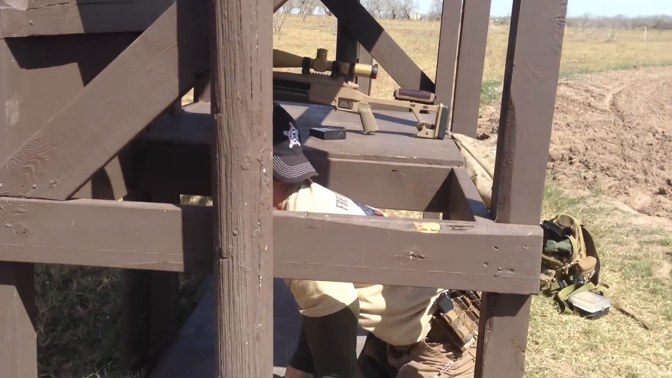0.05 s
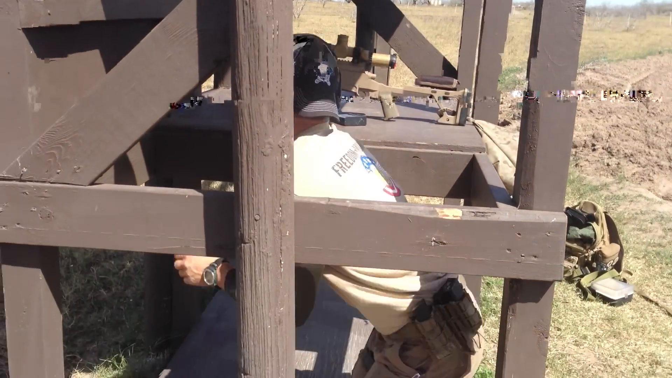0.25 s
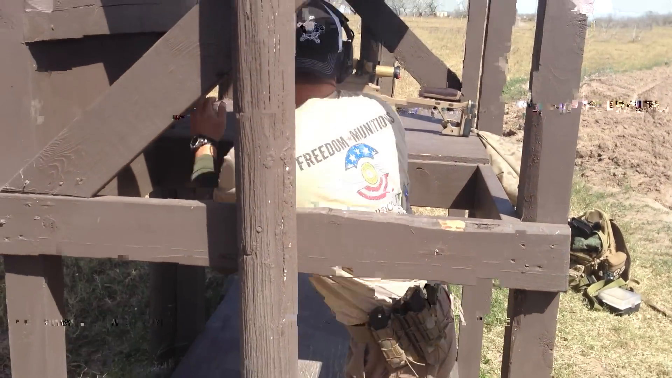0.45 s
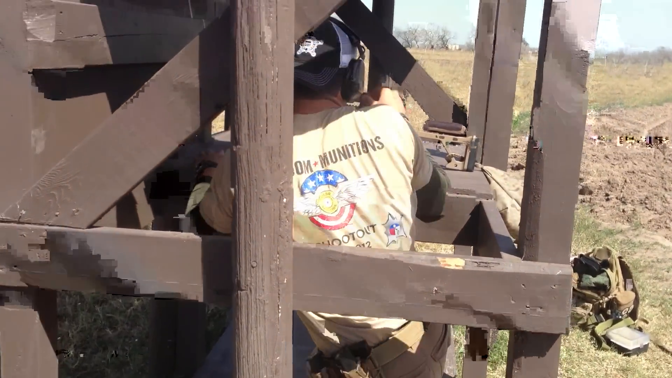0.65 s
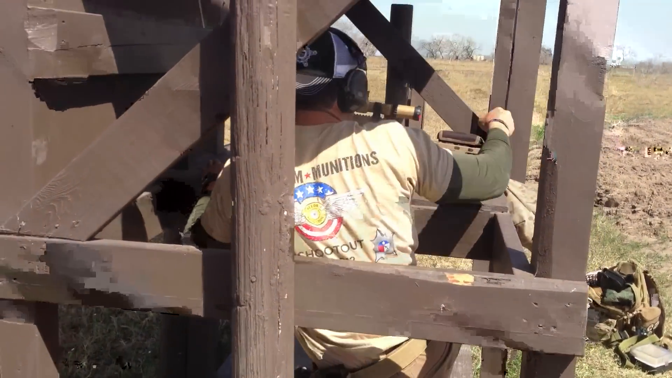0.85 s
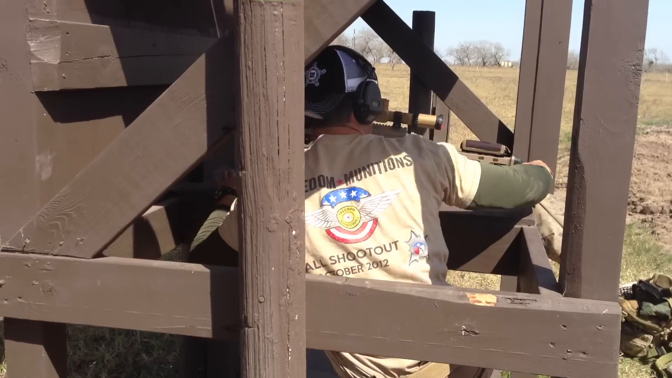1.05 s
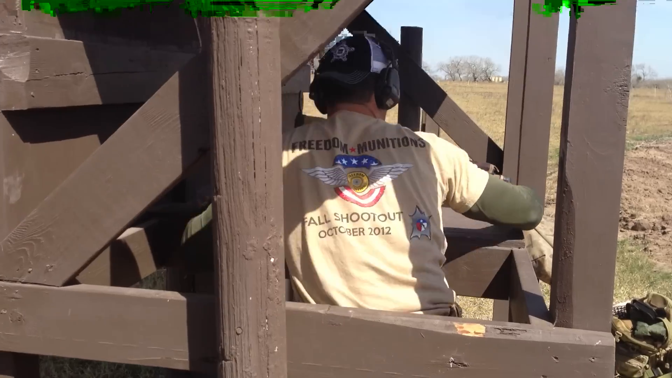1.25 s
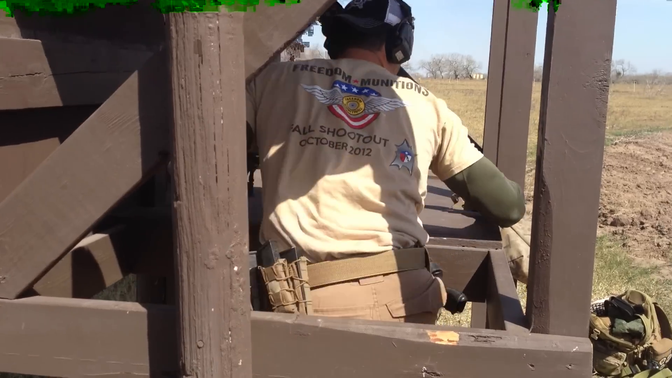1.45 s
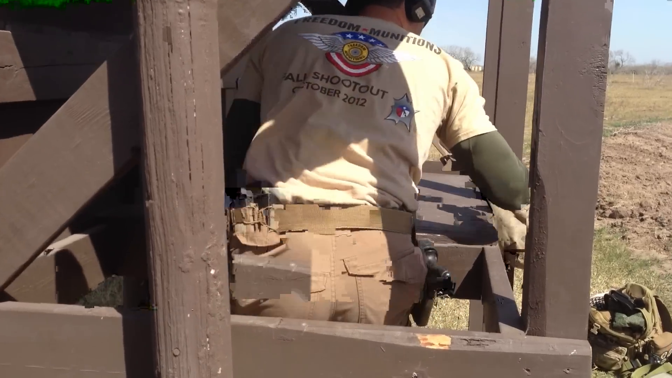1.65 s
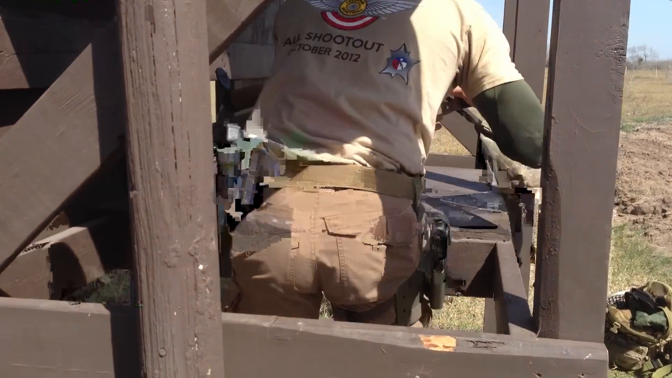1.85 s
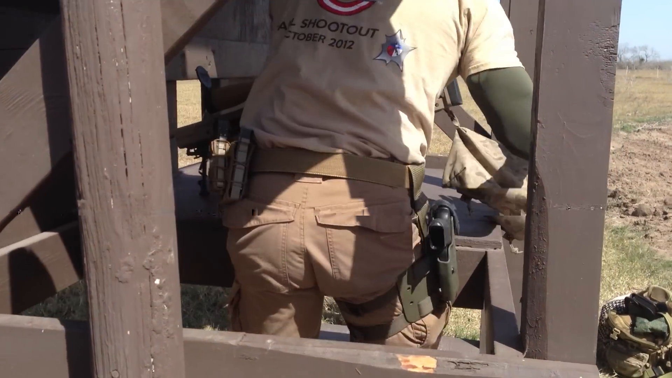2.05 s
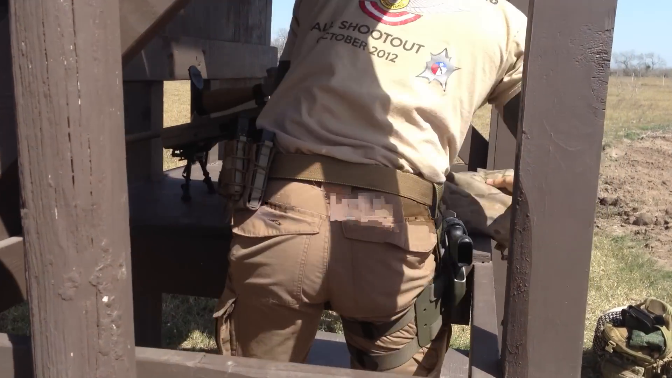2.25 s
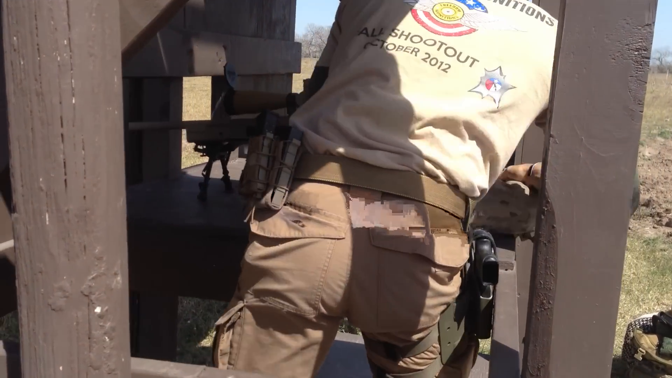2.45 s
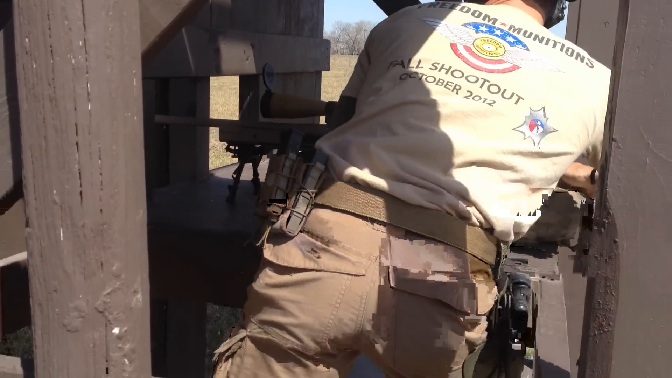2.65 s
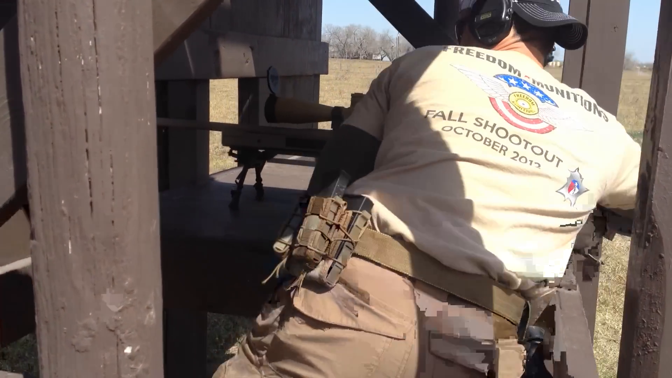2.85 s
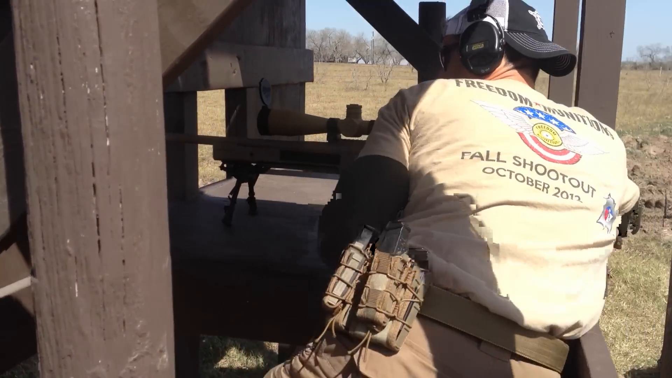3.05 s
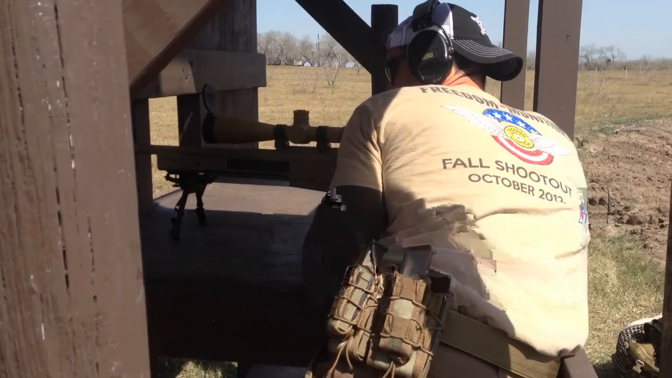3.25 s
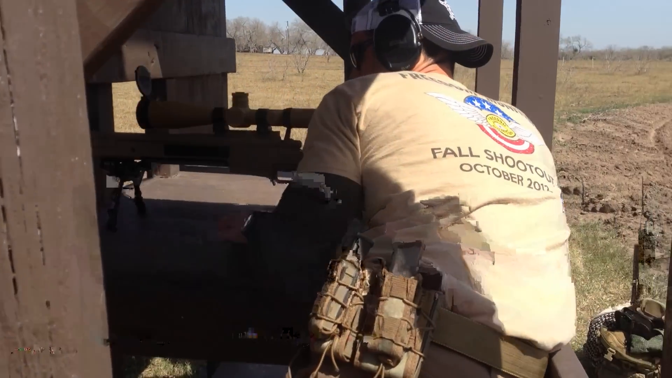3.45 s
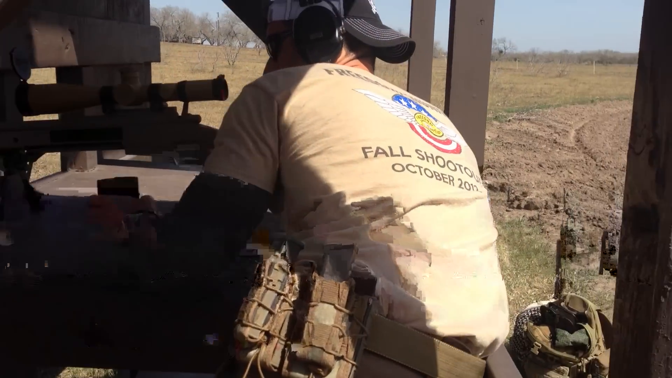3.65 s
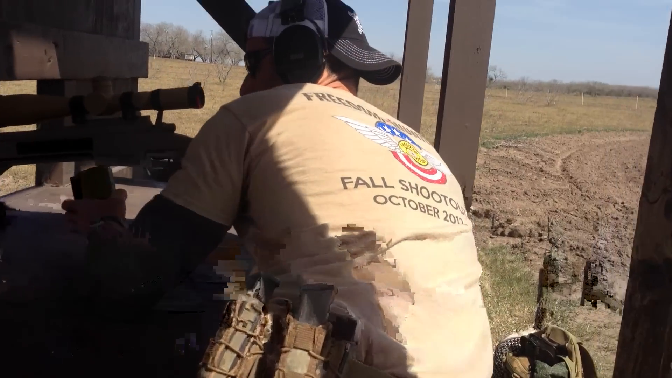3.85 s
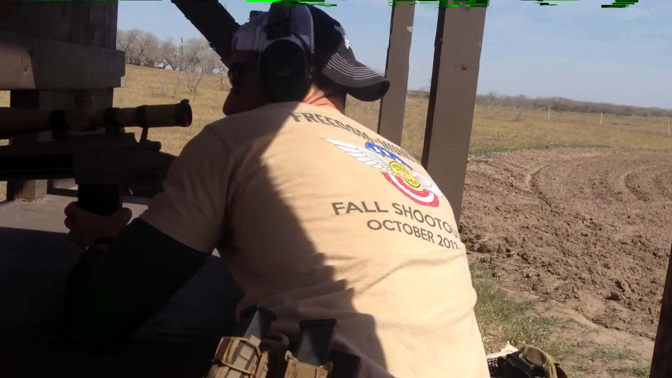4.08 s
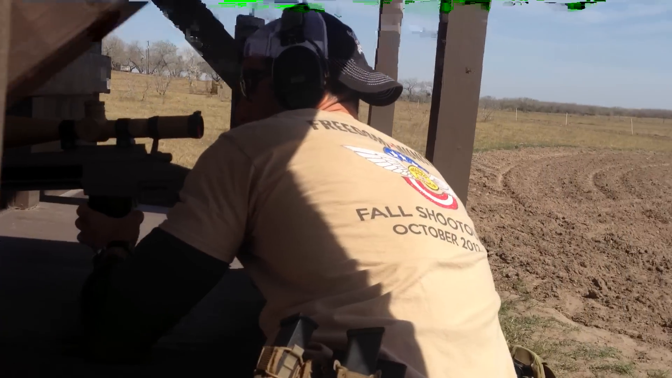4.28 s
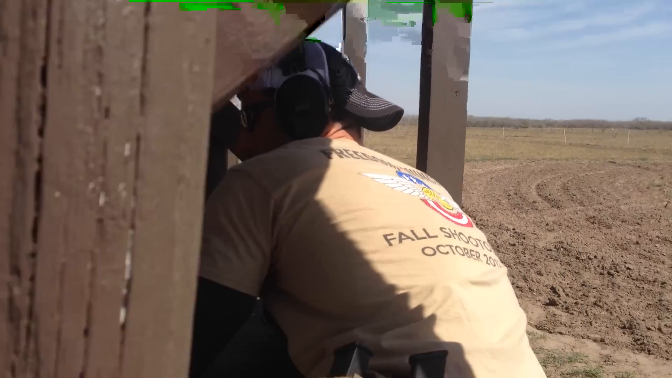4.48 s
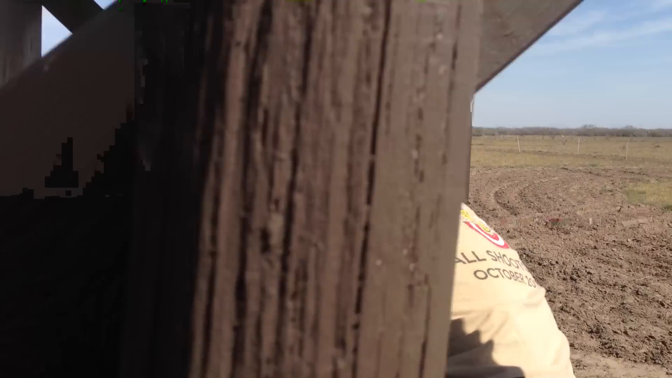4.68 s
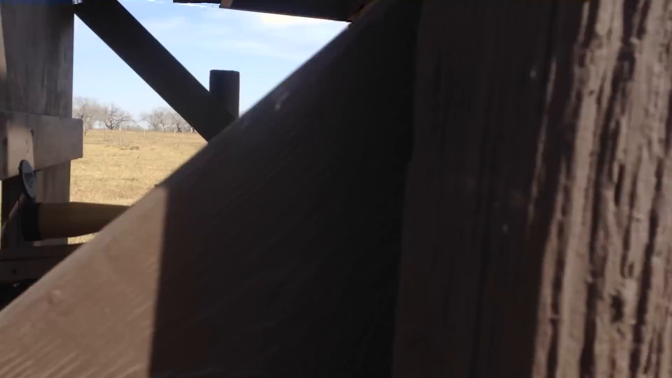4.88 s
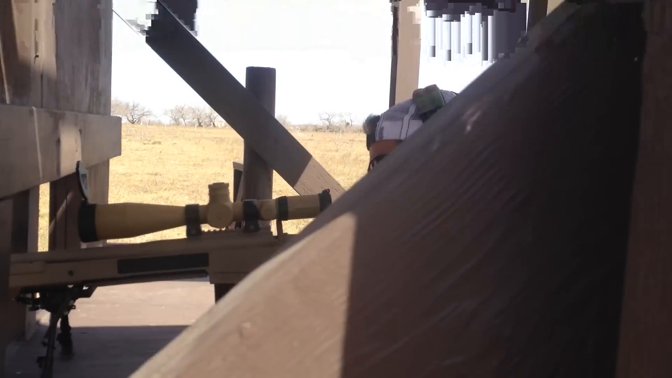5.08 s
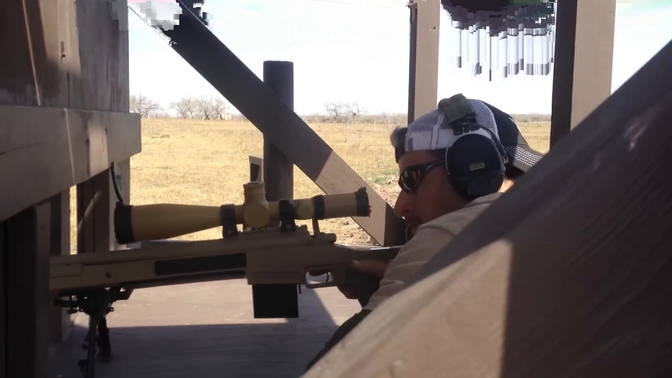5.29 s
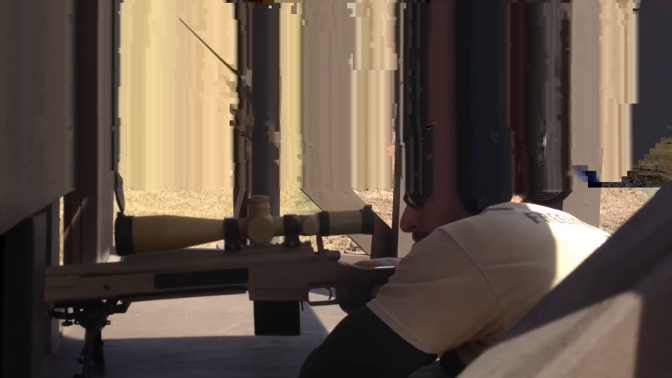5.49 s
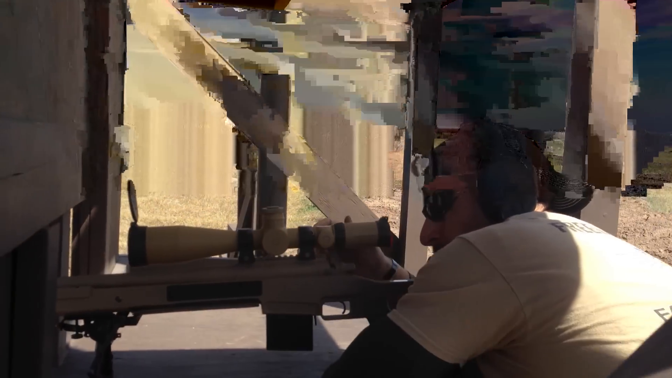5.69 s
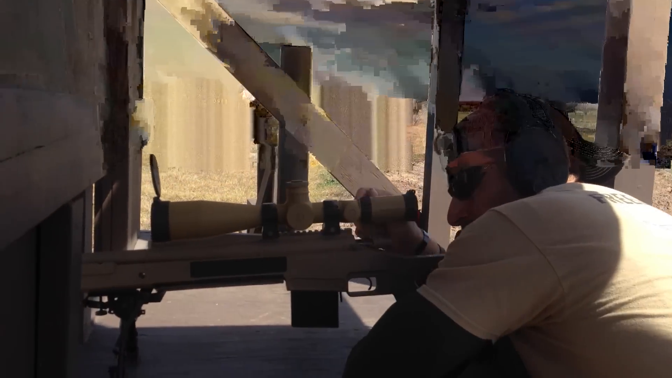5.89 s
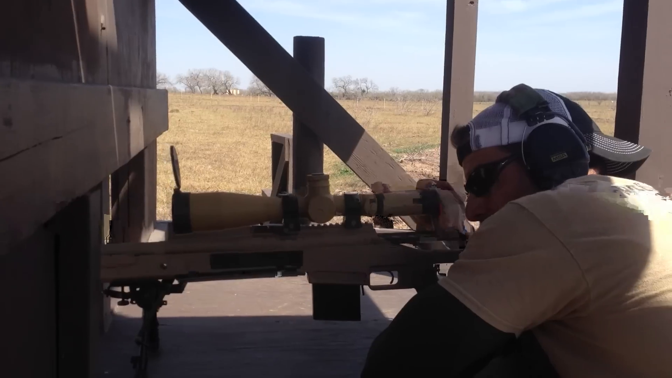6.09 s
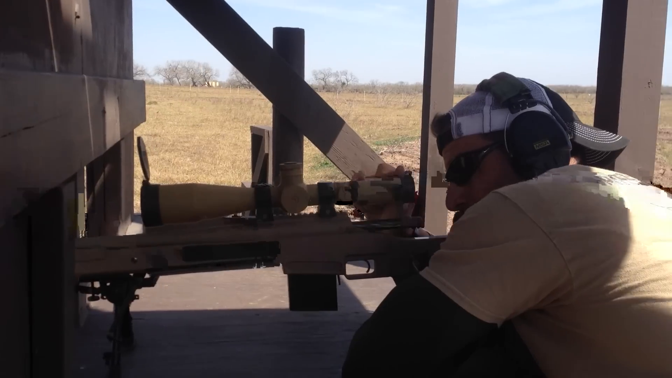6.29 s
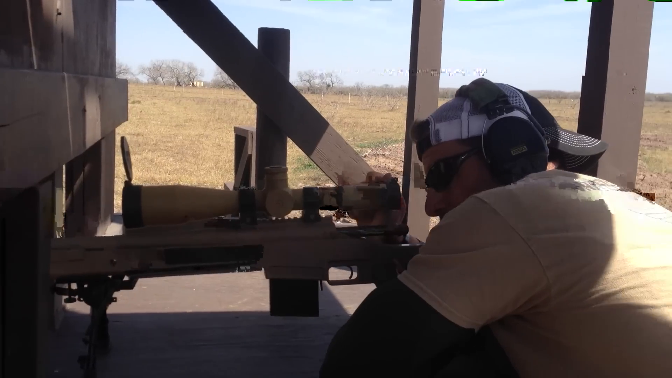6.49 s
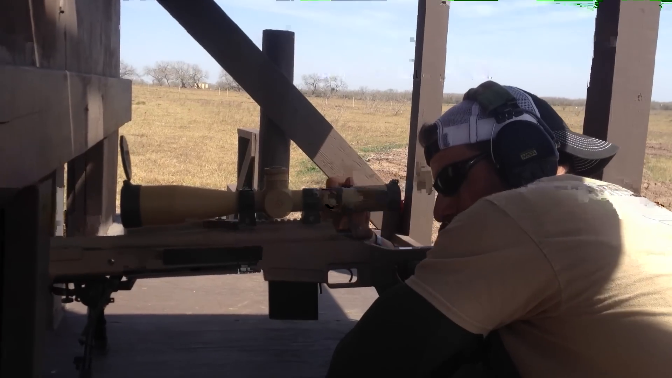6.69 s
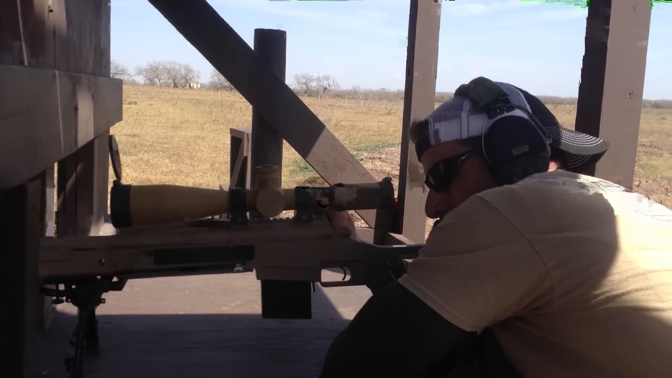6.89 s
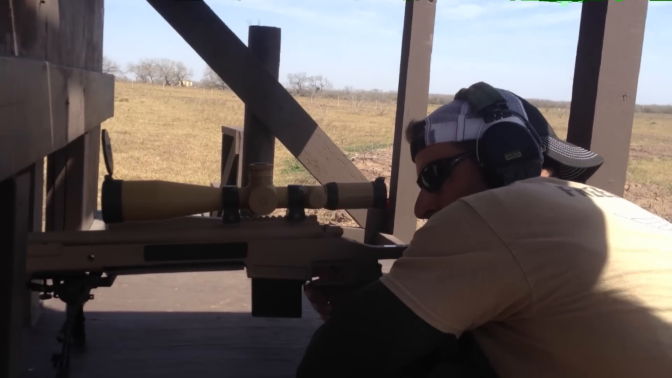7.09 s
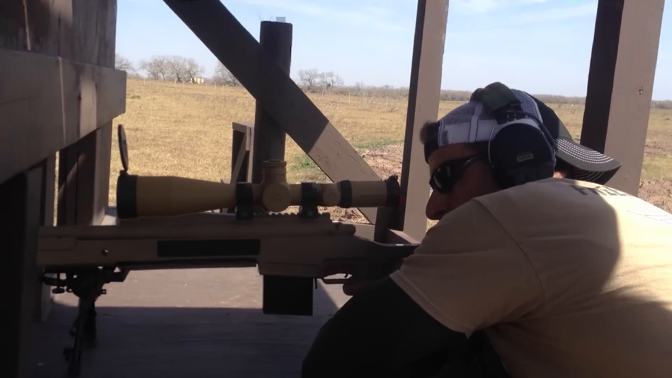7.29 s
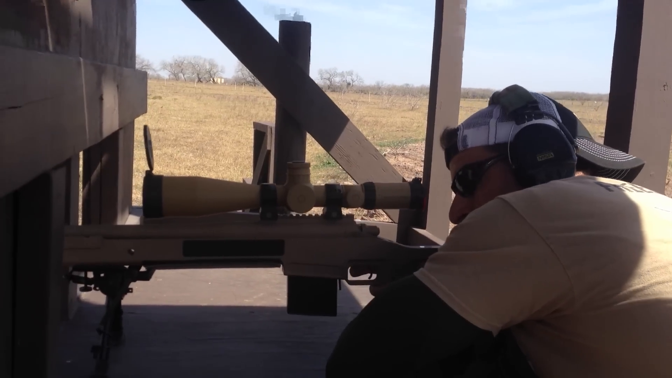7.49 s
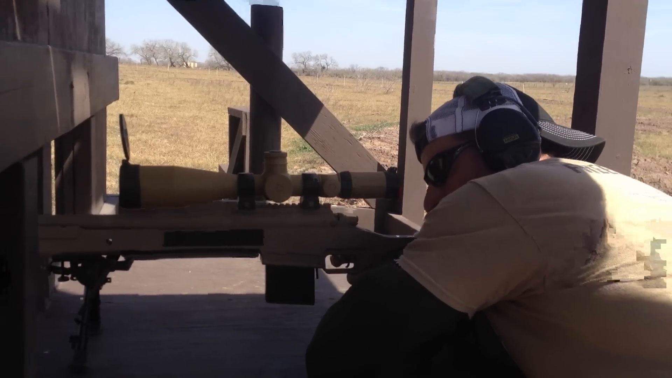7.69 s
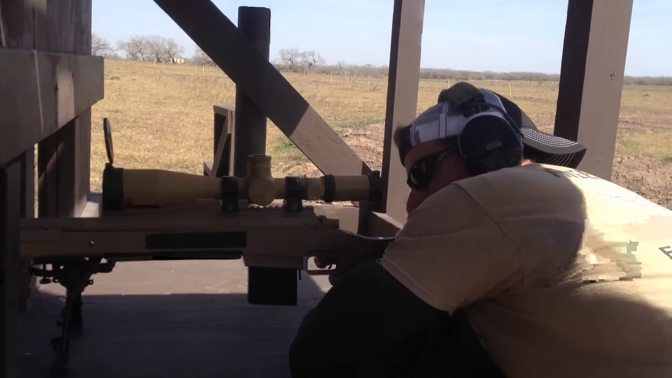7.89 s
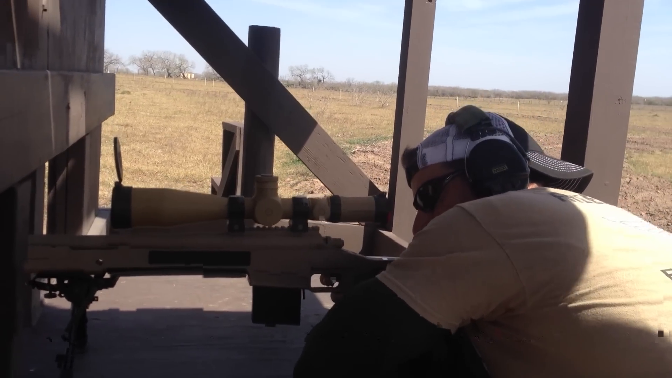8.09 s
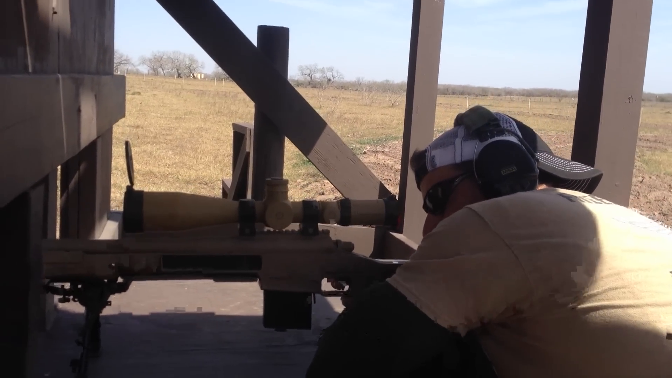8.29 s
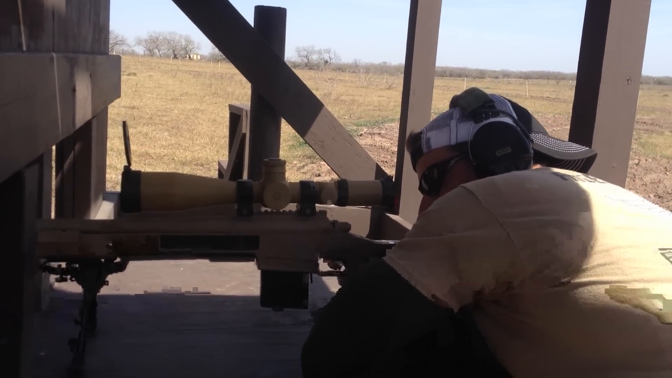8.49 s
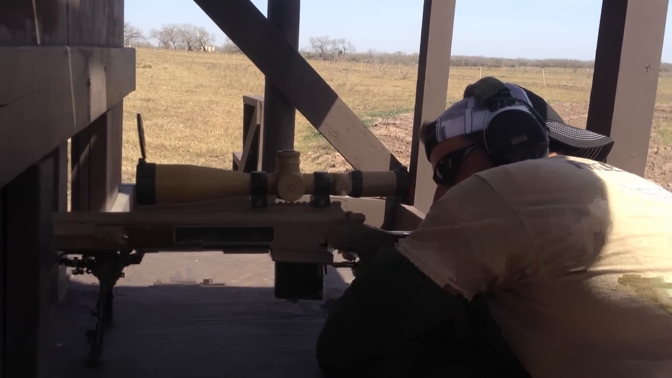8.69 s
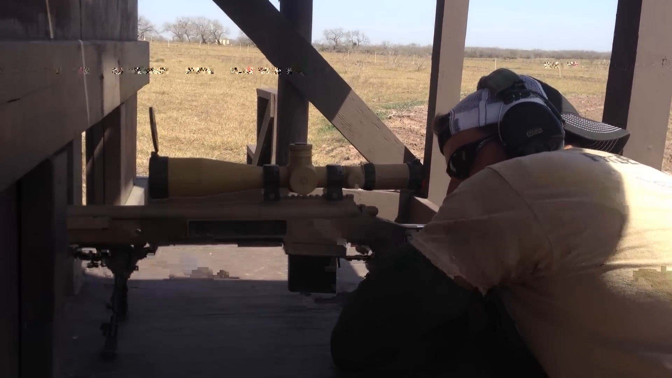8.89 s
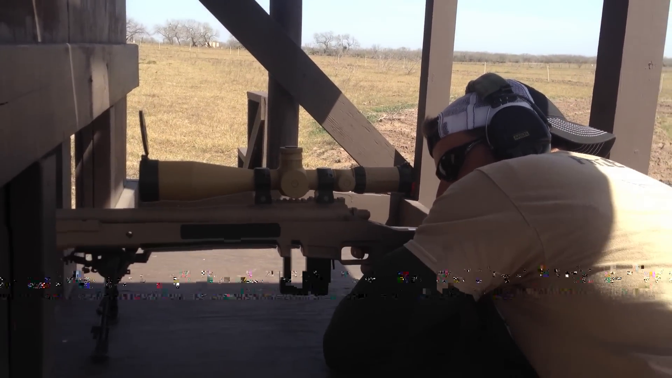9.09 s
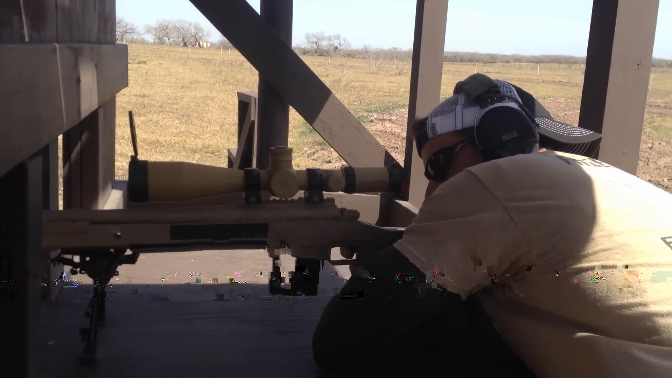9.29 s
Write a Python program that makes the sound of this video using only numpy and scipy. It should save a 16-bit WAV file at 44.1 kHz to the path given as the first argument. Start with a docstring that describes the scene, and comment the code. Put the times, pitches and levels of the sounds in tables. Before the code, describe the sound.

Dull boot bumps and gear taps on a wooden platform with scuffing and rustling cloth, then sharp steel rifle clacks, then quiet rustles.

```python
"""First dull bumps and low scuffing of footsteps and a handled camera, with gear taps and rustling cloth;
then a rifle is worked, its magazine seated and bolt moved: sharp steel clacks with thumps below.
After them a few taps, strokes and rustles of cloth over the open air, a steady murmur all through.
Contacts are filtered noise bursts, steel adds decaying sines, and rubbing is ticking noise under level curves."""
import sys
import numpy as np
from scipy import signal
from scipy.io import wavfile
from scipy.ndimage import uniform_filter1d, minimum_filter1d

SR = 44100
rng = np.random.default_rng(int(sys.argv[2]) if len(sys.argv) > 2 else 0)


def store_wav(level_fs):
    """Save 16-bit WAV to argv[1]."""
    pcm = np.round(np.clip(np.atleast_2d(level_fs), -1, 1) * 32767)
    wavfile.write(sys.argv[1], SR, pcm.T.astype(np.int16))


N = 411894

# Levels in the tables are relative: layer gains and the output stage follow.
# open-air spectrum: (frequency [Hz], gain [dB])
AIR_SPECTRUM = [(25, -52), (136, 8), (281, -1.5), (684, -5), (919, -13.5), (1450, -10), (2300, -17.5),
                (6050, -14.5), (7500, -21), (9050, -17), (14300, -18.5), (15500, -20.5)]
# rubbing of clothes and webbing: (time [s], level [dB])
RUSTLE_LEVEL = [(0, -60), (0.4, -73), (0.92, -67), (1.3, -72), (1.68, -62), (2.05, -67), (2.32, -63.5),
                (2.9, -67.5), (3.45, -59), (3.8, -65), (5.2, -67), (5.48, -59), (5.8, -64), (6.42, -72),
                (7.22, -64.5), (7.9, -75), (8.58, -63.5), (9.1, -70), (9.28, -63)]
# cloth spectrum: (frequency [Hz], gain [dB])
CLOTH_SPECTRUM = [(300, -17.5), (800, -3), (1500, -2), (2800, -5.5), (4400, -4.5), (5800, -5), (6800, 0),
                  (7500, 7.5), (8500, -4.5), (10000, -14), (15000, -24.5)]
# short scrapes of cloth and webbing: (mid time [s], level [dB], colour [Hz])
SCRAPE_EVENTS = [(0.091, -46.5, 4430), (1.933, -54, 2570), (2.185, -56, 3670), (2.232, -52, 4120),
                 (2.83, -57.5, 2000), (3.105, -56.5, 1300), (3.407, -52, 1778), (3.446, -54.5, 3300),
                 (3.982, -52.5, 5030), (4.441, -46.5, 4400), (5.141, -50, 5000), (5.551, -48.5, 6600),
                 (8.248, -48, 6860), (8.823, -54.5, 5030), (8.877, -50, 5200)]
# faint scuffing between swells: (time [s], level [dB])
SCUFF_LEVEL = [(0.92, -68), (1.4, -56.5), (2.3, -58), (3.55, -58.5), (3.85, -66), (5.35, -56), (5.9, -68.5),
               (9.34, -69.5)]
# swells of scuffing: (peak time [s], level [dB], swell [s], fade [s], grit re rub [dB])
SCUFF_EVENTS = [(0.25, -44, 1, 0.3, -11.5), (0.573, -42.5, 0.094, 0.03, -1.5),
                (0.828, -40, 0.018, 0.054, -24), (1.056, -45.5, 0.094, 0.078, -12),
                (1.18, -31.5, 0.038, 0.048, -7.5), (1.407, -42.5, 0.1, 0.11, -16),
                (1.539, -30, 0.044, 0.026, -2), (1.66, -41.5, 0.046, 0.1, -16),
                (1.91, -41.5, 0.068, 0.079, -26), (2.17, -41.5, 0.054, 0.025, -30),
                (2.89, -49, 0.071, 0.055, -30), (3.2, -53.5, 0.19, 0.06, -33),
                (3.47, -51, 0.12, 0.059, -18), (4.42, -46.5, 0.21, 0.15, -19),
                (4.75, -56, 0.018, 0.076, -28)]
# dull rub spectrum: (frequency [Hz], gain [dB])
SCUFF_SPECTRUM = [(25, -37.5), (60, -20.5), (110, -2), (170, 3.5), (240, 3.5), (400, -6), (650, -21.5),
                  (1000, -28.5), (2000, -44)]
# gritty rub spectrum: (frequency [Hz], gain [dB])
GRIT_SPECTRUM = [(120, -35), (300, 0), (550, 3.5), (1000, -12.5), (2200, -31.5), (3200, -38), (5000, -56)]
# gear on timber: (time [s], level [dB], pitch [Hz], boost at that resonance [dB])
TAP_EVENTS = [(0.684, -46, 755, 19), (0.75, -53, 620, 13), (1.261, -37, 980, 3), (2.008, -43.5, 1264, 10),
              (2.167, -43, 1870, 5), (2.425, -50.5, 1750, 14), (2.618, -38, 672, 29),
              (2.653, -48, 1940, 10.5), (2.963, -46.5, 840, 11), (3.108, -52, 1820, 12),
              (4.024, -40, 1790, 11), (4.1923, -35, 1720, 7.5), (4.207, -50, 1300, 17),
              (4.379, -35.5, 727, 13), (8.165, -61.5, 2470, 25), (8.869, -50.5, 2540, 19)]
# tap spectrum: (frequency [Hz], gain [dB])
TAP_SPECTRUM = [(200, -7), (700, 6), (1800, -3), (3500, -3), (5500, -3), (7500, 22.5), (10000, -34)]
# footsteps and camera handling: (time [s], level [dB], nominal pitch [Hz], crispness of upper part [dB])
BUMP_EVENTS = [(0.02, -22, 250, -26), (0.575, -25, 251, -17), (0.669, -28.5, 380, -22),
               (0.683, -22.5, 304, -20), (0.748, -22.5, 181, -13.5), (0.872, -28.5, 205, -8.5),
               (1.142, -22, 187, -18.5), (1.192, -24.5, 208, -9.5), (1.26, -22, 258, -12.5),
               (1.463, -19, 197, -28), (1.508, -24.5, 180, -30), (1.589, -21.5, 189, -35),
               (1.677, -18.5, 180, -37), (1.827, -28.5, 174, -10), (2.0127, -11, 220, -26.5),
               (2.02, -19, 283, -29), (2.042, -26, 290, -20.5), (2.379, -34, 268, -24),
               (2.429, -40, 190, -42), (2.513, -31.5, 215, -32), (2.573, -33, 202, -12),
               (2.618, -18.5, 230, -23), (2.627, -18.5, 238, -12.5), (2.681, -20.5, 180, -10.5),
               (2.704, -24, 242, -16), (2.945, -34, 246, -46), (3.4, -25, 165, -57),
               (3.443, -17.5, 191, -33), (3.488, -30, 278, -33), (3.965, -27.5, 273, -28),
               (4.08, -18.5, 168, -16.5), (4.358, -20.5, 200, -26), (4.382, -19.5, 164, -12),
               (4.412, -23.5, 200, -18), (4.5, -30, 95, -57), (4.588, -23, 271, -27),
               (5.001, -32.5, 197, -4.5), (5.099, -29.5, 216, -20), (5.153, -28.5, 198, -15.5),
               (5.925, -35.5, 195, -26), (9.269, -44.5, 165, -48)]
# bump spectrum before pitch stretch: (frequency [Hz], gain [dB])
BUMP_SPECTRUM = [(25, -49), (60, -40), (110, -15.5), (160, 0.5), (240, 4), (400, -3), (650, -15.5),
                 (1000, -31.5), (2000, -56), (4000, -66)]
# magazine and bolt: (time [s], level [dB], body [dB], top edge [dB], struck-part pitch [Hz], its ring [dB])
CLACK_EVENTS = [(4.0804, -33, -1, -30, 3220, -7), (4.092, -31, 5, -26, 4120, -28),
                (4.2307, -19.5, -12, -24, 3770, -12.5), (4.2443, -31, 0, -42, 4340, -21),
                (4.4644, -10.5, -10, -32, 6640, -30), (4.497, -18, -12.5, -10.5, 4340, -16),
                (4.569, -31.5, -2, -18, 5560, -14), (5.529, -29.5, 4, -8, 5670, -10),
                (5.963, -35.5, -7, -38.5, 7030, -5), (5.9855, -20, -4.5, -32, 5350, -7),
                (6.046, -32.5, -6, -20.5, 5040, -14), (6.088, -8, -15.5, -34.5, 4360, -15),
                (6.108, -16, -21.5, -45.5, 4290, -10.5), (6.113, -2, -6, -44, 5020, -6.5),
                (6.277, -26, 4, -18, 4740, 1), (6.324, -33.5, -23, -59, 7370, 0),
                (6.54, -32.5, 3, -18, 4170, -15), (6.6218, -21, -14, -34, 4040, -15),
                (6.637, -23.5, -2, -36, 5124, -16.5), (6.698, -22.5, -8, -39, 1620, -18.5),
                (6.711, -24, -5, -29.5, 4100, -16.5), (6.7199, -10.5, -25.5, -22, 7030, -5.5),
                (6.729, -2.5, -11.5, -12.5, 4860, -11.5), (6.756, -23.5, 6, -30, 4700, -15.5),
                (6.8361, -1.5, -10, -20.5, 4240, -10), (6.992, -39.5, -6, -30, 4200, -13),
                (7.046, -9.5, 2.5, -12.5, 4970, -2.5)]
# bench response: (frequency [Hz], gain [dB])
BENCH_SPECTRUM = [(40, -34.5), (100, 2.5), (150, 12), (260, -1.5), (370, -2), (465, 7.5), (600, -3),
                  (800, -16.5), (1080, -4), (2000, -28), (4000, -61.5)]
# steel contact spectrum: (frequency [Hz], gain [dB])
CRACK_SPECTRUM = [(100, -47.5), (550, -20), (900, -29), (1300, -13.5), (2000, -10), (2650, -10.5),
                  (3100, -12.5), (3600, -7), (4500, -5), (5750, -3.5), (6650, -2), (7400, 9), (8500, -6),
                  (9800, -23), (15000, -50)]
# steel modes: (frequency [Hz], mean level [dB], T60 [s])
STEEL_MODES = [(1390, -22, 0.11), (1750, -20.5, 0.08), (4075, -13, 0.078), (4310, -8.5, 0.075),
               (4950, -8, 0.06), (5380, -12.5, 0.07), (6175, -8.5, 0.065), (7020, -3.5, 0.055),
               (7410, -1.5, 0.068), (7340, 2, 0.075), (7770, 3, 0.04)]


def amp(db):
    """Decibels to gain."""
    return 10 ** (np.asarray(db) / 20)


def evened(x):
    """Scales to unit rms."""
    return x / np.sqrt(np.mean(x ** 2) + 1e-20)


def peaked(x, size):
    """Scales the loudest stretch of size samples to unit rms."""
    return x / np.sqrt(uniform_filter1d(x ** 2, size).max() + 1e-20)


def read(points, hz):
    """Interpolates a spectrum in dB over log frequency."""
    point_hz, db = np.transpose(points)
    return np.interp(np.log(hz + 1), np.log(point_hz + 1), db)


def follow(curve):
    """Level curve to per-sample gain."""
    time_s, db = np.transpose(curve)
    return amp(np.interp(np.arange(N) / SR, time_s, db))


def add(mix, start_s, sound):
    """Adds a sound into mix in place, cropped at both ends."""
    start = round(start_s * SR)
    sound = sound[max(-start, 0):]
    part = mix[max(start, 0):][:len(sound)]
    part += sound[:len(part)]


def colour(x, gain_db, size=4096):
    """Minimum-phase filter from gain in dB as a function of frequency."""
    hz = abs(np.fft.fftfreq(size, 1 / SR))
    log_gain = np.log(amp(np.maximum(gain_db(hz), -100)))
    # the Hilbert transform of log gain supplies the causal phase
    response = np.exp(np.conj(signal.hilbert(log_gain)))
    impulse = np.fft.ifft(response).real
    return signal.fftconvolve(x, impulse[:size // 2])[:len(x)]


def shelf(hz, corner_hz, order):
    """Rises from 0 below the corner to 1 above it."""
    return 1 - 1 / (1 + (hz / corner_hz) ** order)


def hump(hz, centre_hz, octaves):
    """Unit-height bell around a frequency."""
    return np.exp(-(np.log2((hz + 1) / centre_hz) / octaves) ** 2)


def drift(rate_hz):
    """Unit-rms random curve with rate_hz new points per second."""
    return evened(np.interp(np.arange(N) / SR * rate_hz, np.arange(N), rng.standard_normal(N)))


def fibres(size, grain_share):
    """Sliding friction: soft hiss plus about 900 tiny catches per second."""
    height_db = 3 * np.minimum(rng.exponential(1, size), 3)
    heights = amp(height_db) * rng.choice([-1, 1], size)
    grains = heights * (rng.random(size) < 900 / SR)
    return rng.standard_normal(size) + grain_share * evened(grains)


def arch(t, swell_s, fade_s):
    """Gaussian rise to one at time zero, Gaussian fall after."""
    return np.exp(-(t / np.where(t < 0, swell_s, fade_s)) ** 2)


def air(rms_db=-64):
    """Open-field murmur and microphone hiss: steady filtered noise."""
    noise = rng.standard_normal(N)
    return amp(rms_db) * evened(colour(noise, lambda hz: read(AIR_SPECTRUM, hz)))


def rustle(gain_db=1.5, patchy_db=2.12, patches_hz=45):
    """Moving clothes rub: fibre noise with uneven strength."""
    rubbing = fibres(N, grain_share=0.17)
    patches = amp(patchy_db * drift(patches_hz))
    cloth = colour(rubbing * patches, lambda hz: read(CLOTH_SPECTRUM, hz))
    return amp(gain_db) * follow(RUSTLE_LEVEL) * evened(cloth)


def scrapes(focus_db=8, focus_octaves=0.99, half_s=0.019):
    """Fabric strokes: fibre noise peaked at its own colour, swelling and fading."""
    out, t = np.zeros(N), np.arange(-8000, 8000) / SR
    for time_s, db, colour_hz in SCRAPE_EVENTS:
        stroke = colour(fibres(len(t), grain_share=2.1), lambda hz: read(CLOTH_SPECTRUM, hz)
                        + focus_db * hump(hz, colour_hz, focus_octaves))
        add(out, time_s + t[0], amp(db) * evened(stroke) * arch(t, half_s, half_s))
    return out


def scuffing(lumpy_db=2.5, lumps_hz=90, bite=1.4, drag_db=-27.5, drag_s=0.036):
    """Uneven friction of footsteps and handling: dull and gritty noise, plus a scuff around each bump."""
    lumps = amp(lumpy_db * drift(lumps_hz))
    dull = colour(rng.standard_normal(N) * lumps,
                  lambda hz: read(SCUFF_SPECTRUM, hz) - 40 * shelf(hz, 2000, order=3))
    gritty = colour(fibres(N, grain_share=1.2) * np.sqrt(lumps), lambda hz: read(GRIT_SPECTRUM, hz))
    dull_gain, grit_gain = follow(SCUFF_LEVEL), np.zeros(N)
    t = np.arange(-SR, SR) / SR
    for time_s, db, swell_s, fade_s, grit_db in SCUFF_EVENTS:
        swell = arch(t, swell_s, fade_s)
        add(dull_gain, time_s + t[0], amp(db) * swell)
        add(grit_gain, time_s + t[0], amp(db + grit_db) * swell ** bite)
    for time_s, db, *_ in BUMP_EVENTS:
        add(dull_gain, time_s + t[0], amp(db + drag_db) * arch(t, drag_s, drag_s))
    return dull_gain * evened(dull) + grit_gain * evened(gritty)


def taps(strike=9, tick_t60_s=0.056, hollow_octaves=0.32, soft_db=-22, soft_ratio=3.14,
         ring_db=-19, ring_t60_s=0.099):
    """Gear on wood: dry tick plus one ringing resonance; low taps lose more treble."""
    out, t = np.zeros(N), np.arange(5000) / SR
    for time_s, db, pitch_hz, hollow_db in TAP_EVENTS:
        def tick_db(hz):
            """Tap spectrum with hollow resonance and softened treble."""
            softness = shelf(hz, soft_ratio * pitch_hz, order=4)
            if pitch_hz < 1500:
                softness = softness + shelf(hz, 2800, order=6)
            hollow = hollow_db * hump(hz, pitch_hz, hollow_octaves)
            return read(TAP_SPECTRUM, hz) + hollow + soft_db * softness

        burst = strike * (t == 0) + rng.standard_normal(len(t)) * amp(-60 * t / tick_t60_s)
        tick = colour(burst, tick_db)
        ring = np.sin(2 * np.pi * pitch_hz * t) * amp(-60 * t / ring_t60_s)
        sound = evened(tick) + amp(hollow_db + ring_db) * evened(ring)
        add(out, time_s, amp(db) * peaked(sound, size=200))
    return out


def bumps(gain_db=-6, patter=0.061, lead_s=0.0062, fade_s=0.009, usual_hz=230, pitch_share=0.62,
          usual_crisp_db=-21, corner_hz=560):
    """Dull bumps of footsteps and a moving camera: one push inside a noise patter, hardly ringing."""
    out, t = np.zeros(N), np.arange(-1500, 5000) / SR
    swell = np.exp(np.minimum(t, 0) / lead_s - np.maximum(t, 0) / fade_s)
    for time_s, db, pitch_hz, crisp_db in BUMP_EVENTS:
        force = patter * swell * rng.standard_normal(len(t)) + (t == 0)
        stretch = (pitch_hz / usual_hz) ** pitch_share
        lift_db = crisp_db - usual_crisp_db
        thud = colour(force, lambda hz: read(BUMP_SPECTRUM, hz / stretch)
                      + lift_db * shelf(hz, corner_hz, order=4))
        add(out, time_s + t[0], amp(db + gain_db) * peaked(thud, size=200))
    return out


def soft_onsets(gain_db=-50, body_share=0.9, before_s=0.0085, half_s=0.003):
    """Faint short noise swell just before each clack, stronger with more body."""
    out, t = np.zeros(N), np.arange(-2000, 2000) / SR
    for time_s, _, body_db, *_ in CLACK_EVENTS:
        noise = colour(rng.standard_normal(len(t)), lambda hz: read(CRACK_SPECTRUM, hz))
        gain = amp(gain_db + body_share * body_db)
        add(out, time_s - before_s + t[0], gain * evened(noise) * arch(t, half_s, half_s))
    return out


def bench(gain_db=-36, t60_s=0.17):
    """Clacks pass through the rifle and thump the wooden bench, more with heavier body."""
    out, t = np.zeros(N), np.arange(9000) / SR
    for time_s, db, body_db, *_ in CLACK_EVENTS:
        shake = rng.standard_normal(len(t)) * amp(-60 * t / t60_s)
        thump = colour(shake, lambda hz: read(BENCH_SPECTRUM, hz))
        add(out, time_s, amp(db + body_db + gain_db) * peaked(thump, size=200))
    return out


def steel_ring(t, spread_db=2.4):
    """Steel modes: decaying sines with random phase and strength."""
    ring = np.zeros(len(t))
    for mode_hz, mode_db, t60_s in STEEL_MODES:
        strength = amp(mode_db + spread_db * rng.standard_normal() - 60 * t / t60_s)
        ring += strength * np.sin(2 * np.pi * (mode_hz * t + rng.random()))
    return ring


def clacks(gain_db=-7, crack_s=0.0062, chatter_db=3.0, chatter_t60_s=0.087, echo_db=-19, echo_t60_s=0.21,
           echo_dull_db=-13, ring_db=-6.0, attack_s=0.00028, usual_body_db=-8, body_share=0.75,
           usual_edge_db=-29, part_t60_s=0.019):
    """Steel parts strike, chatter and ring, and nearby timber returns a duller noise tail."""
    out, t = np.zeros(N), np.arange(9000) / SR
    contact = np.exp(-(t / crack_s) ** 4)
    timber_echo = amp(echo_db - 60 * t / echo_t60_s)
    knots = t[::90]  # uneven rebounds, about every 2 ms
    for time_s, db, body_db, edge_db, part_hz, own_db in CLACK_EVENTS:
        rebounds = amp(chatter_db * np.interp(t, knots, rng.standard_normal(len(knots))))
        chatter = rebounds * amp(-60 * t / chatter_t60_s)
        crack = colour((contact + chatter) * rng.standard_normal(len(t)),
                       lambda hz: read(CRACK_SPECTRUM, hz))
        crack += colour(rebounds * timber_echo * rng.standard_normal(len(t)),
                        lambda hz: read(CRACK_SPECTRUM, hz) + echo_dull_db * shelf(hz, 4500, order=2))
        sound = evened(crack) + amp(ring_db) * evened(steel_ring(t))
        sound *= 1 - np.exp(-t / attack_s)
        # body sets the part below 7.3 kHz, top edge the brightness above 9 kHz
        body_lift_db = body_share * (body_db - usual_body_db)
        edge_lift_db = edge_db - usual_edge_db
        sound = colour(sound, lambda hz: body_lift_db * (1 - shelf(hz, 7300, order=8))
                       + edge_lift_db * shelf(hz, 9000, order=16))
        own_ring = np.sin(2 * np.pi * part_hz * t) * amp(-60 * t / part_t60_s)
        own_ring *= np.minimum(t * SR / 20, 1)  # 20-sample attack
        sound = evened(sound) + amp(own_db) * evened(own_ring)
        add(out, time_s, amp(db + gain_db) * peaked(sound, size=130))
    return out


def scene():
    """Sums all sources into one channel."""
    strikes = bumps() + clacks() + soft_onsets() + bench() + taps()
    rubbing = scrapes() + scuffing() + rustle()
    return (strikes + rubbing + air())[None]


def record(dry, threshold_db=-17, squeeze=0.32, recovery_db_per_s=9, ceiling=0.68, edge_hz=15600):
    """Gain control with slow detector recovery, peak limiter, then low-pass."""
    power = signal.lfilter(np.ones(256) / 256, 1, dry[0] ** 2)
    power_db = 10 * np.log10(abs(power) + 1e-12)
    # peak hold that falls at the recovery rate
    fall_db = np.arange(N) / SR * recovery_db_per_s
    held_db = np.maximum.accumulate(power_db + fall_db) - fall_db
    over_db = np.maximum(held_db - threshold_db, 0)
    ducked = dry * amp(-squeeze * over_db)
    headroom = np.minimum(1, ceiling / (abs(ducked) + 1e-9))
    limited = ducked * uniform_filter1d(minimum_filter1d(headroom, size=61), size=61)
    low_pass = signal.firwin(511, edge_hz, window=("kaiser", 9), fs=SR)
    return signal.oaconvolve(limited, low_pass[None], "same")


dry = scene()
out = record(dry)
store_wav(out)
```